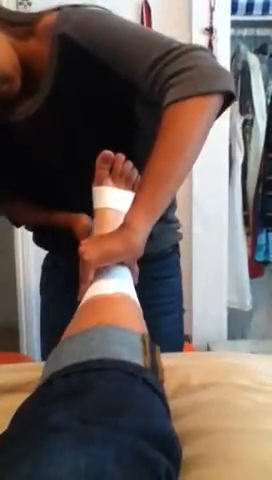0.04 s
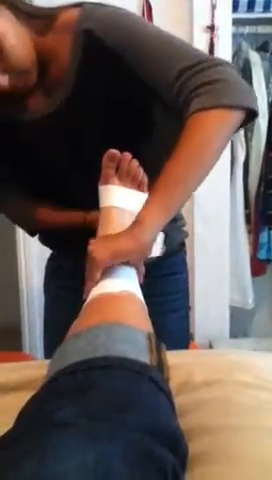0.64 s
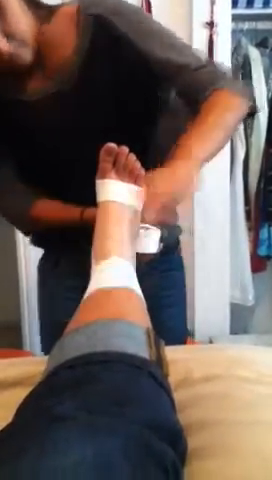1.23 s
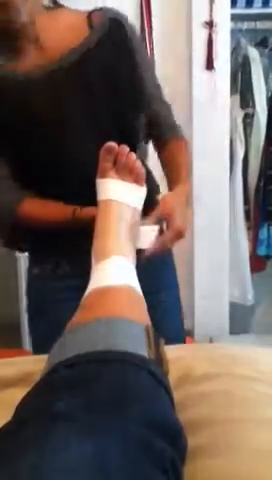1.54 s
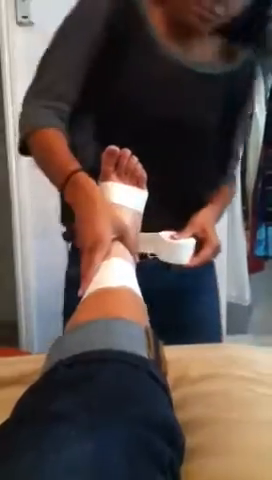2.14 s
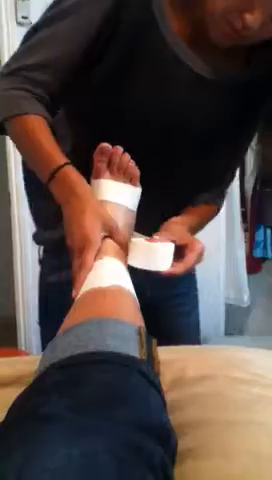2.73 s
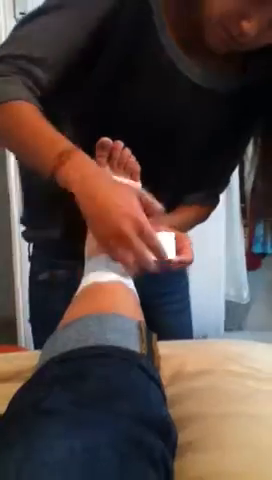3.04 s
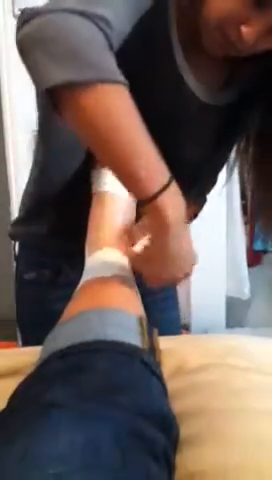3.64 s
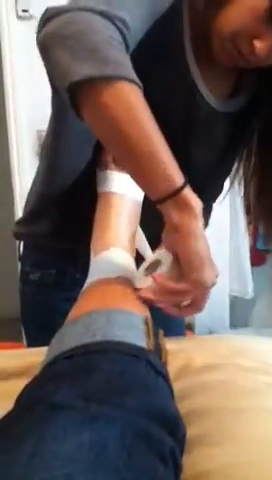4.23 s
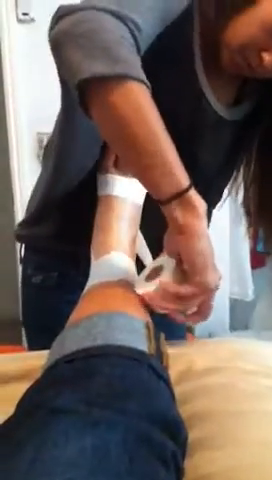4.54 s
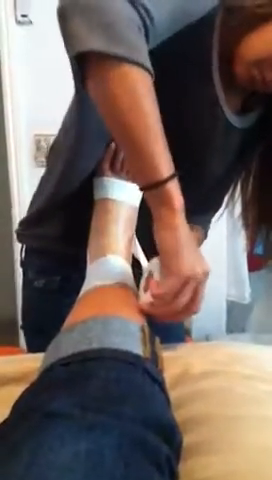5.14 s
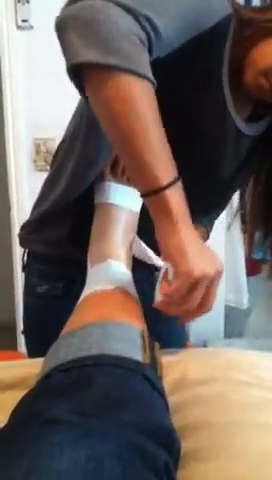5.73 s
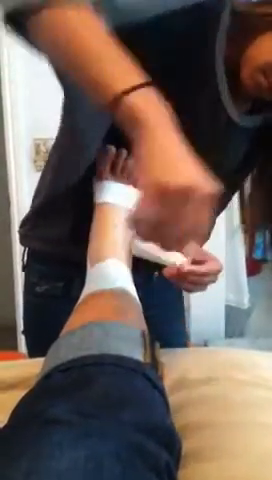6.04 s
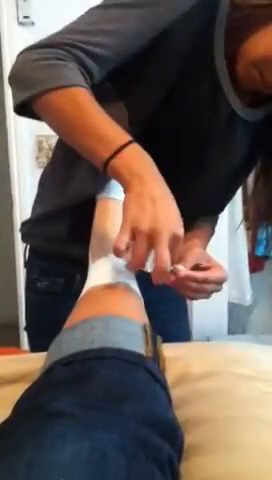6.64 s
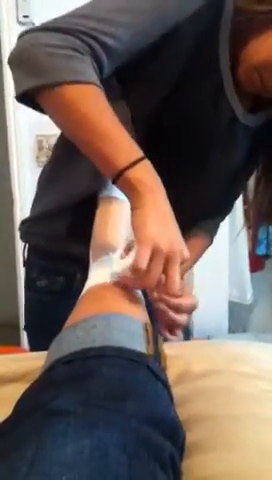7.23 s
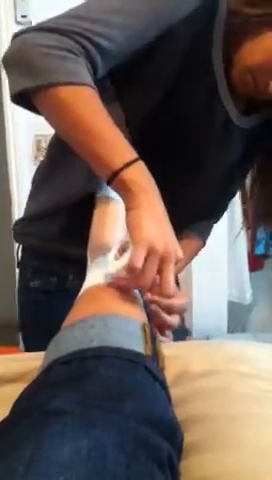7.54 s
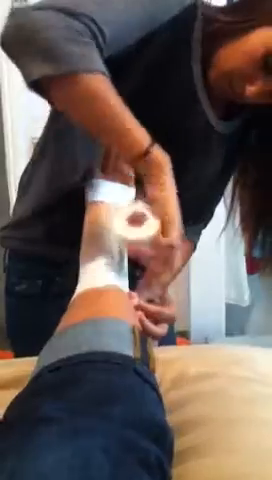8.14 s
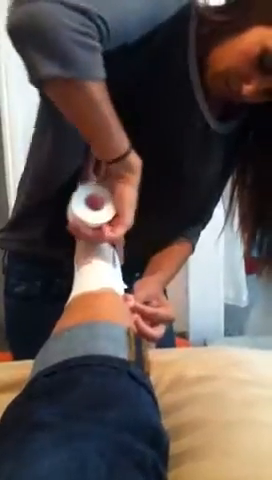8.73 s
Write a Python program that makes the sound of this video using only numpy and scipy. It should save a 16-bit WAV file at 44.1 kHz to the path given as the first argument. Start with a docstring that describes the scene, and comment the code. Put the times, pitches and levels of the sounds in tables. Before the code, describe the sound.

In a small quiet room with faint rumble and hiss, a hand brushes over taped skin near the microphone. Two lengths of sticky tape unwind with a fine crackle, the second trailing off into small clicks. One short, sharp rip, the loudest sound, tears the tape. After it come very faint high squeaks and soft rubbing as fingers stick the end down.

```python
"""Taping an ankle

In a small quiet room a palm smooths tape down, skin catching in countless small slips. Two lengths peel
off the roll with a fine crackle of snapping glue threads, and the strip tears across in one quick rip.
Fingers press the end on with small ticks and faint stick-slip squeaks, over low rumble and hiss."""
import sys
import numpy as np
from scipy import signal
from scipy.fft import rfft, irfft
from scipy.io import wavfile
from scipy.ndimage import uniform_filter1d

SR = 44100
rng = np.random.default_rng(int(sys.argv[2]) if len(sys.argv) > 2 else 0)


def store_pcm(level_fs):
    """Save levels as 16-bit WAV."""
    pcm = np.round(np.clip(level_fs, -1, 1) * 32767).astype(np.int16)
    wavfile.write(sys.argv[1], SR, np.atleast_2d(pcm).T)


N = 396900
TIME = np.arange(N) / SR

# top end of peel and tear: freq_hz, gain_db
FIZZ_SPECTRUM = [(4000, -27), (6500, -3.5), (8000, 0.5), (10000, -1.5), (12500, -7), (15500, -26.5)]


def from_db(db):
    """Decibels to gain."""
    return 10 ** (np.asarray(db) / 20)


def unit_rms(x):
    """Scale to unit power."""
    return x / np.sqrt(np.mean(x ** 2) + 1e-20)


def in_time(rows):
    """Columns after time_s, interpolated to every sample."""
    time_s, *columns = np.transpose(rows)
    return [np.interp(TIME, np.sort(time_s), column) for column in columns]


def during(rows):
    """Soft-edged gate from the first row's time to the last."""
    return uniform_filter1d(1. * ((TIME >= rows[0][0]) & (TIME <= rows[-1][0])), size=128)


def at_hz(points, hz):
    """Read a table on a log-frequency axis."""
    freq_hz, value = np.transpose(points)
    return np.interp(np.log(hz + 1e-3), np.log(freq_hz), value)


def coloured(x, spectrum):
    """Minimum-phase filter of unit power gain; rolls off below the first point."""
    size = 8192
    hz = np.arange(size // 2 + 1) * SR / size
    gain = from_db(at_hz(spectrum, hz)) * np.clip(hz / spectrum[0][0], 1e-2, 1) ** 2
    cepstrum = irfft(np.log(gain))[:size // 2]
    cepstrum[0] = 0
    response = irfft(np.exp(rfft(2 * cepstrum, size)))
    return signal.oaconvolve(x, response / np.linalg.norm(response))[:N]


def resonate(x, hz, width_hz):
    """Two-pole resonance, unit peak gain."""
    radius = np.exp(-np.pi * width_hz / SR)
    feedback = [1, -2 * radius * np.cos(2 * np.pi * hz / SR), radius ** 2]
    return signal.lfilter(np.array([1, 0, -1]) * (1 - radius ** 2) / 2, feedback, x + 1e-18)


def gliding_resonance(x, hz, width_hz):
    """Resonance following a pitch curve; unit power."""
    carrier = np.exp(2j * np.pi * np.cumsum(hz) / SR)
    baseband = signal.lfilter(*signal.butter(2, width_hz / 2, fs=SR), x / carrier + 1e-18)
    return unit_rms(np.real(baseband * carrier))


def wander(rate_hz):
    """Random motion, rate_hz new values a second; spread about 1."""
    return 1.2 * np.interp(TIME * rate_hz, np.arange(6000), rng.standard_normal(6000))


def grains(per_s, spread_db, clump_db, clump_hz=140):
    """Tiny clumped snaps of uneven size; even power over longer times."""
    chance, draw = rng.random((2, N))
    born = chance < per_s / SR
    signed = draw[born] - .5
    excess = np.minimum(-np.log(2 * np.abs(signed) + 1e-9), 4.5)
    snaps = np.zeros(N)
    snaps[born] = from_db(spread_db * excess + clump_db * wander(clump_hz)[born]) * np.sign(signed)
    return snaps / np.sqrt(np.abs(uniform_filter1d(snaps ** 2, size=2600)) + 1e-6)


def add(track, start_s, sound):
    """Mix a short sound in at start_s."""
    start = max(int(start_s * SR), 0)
    track[start:start + len(sound)] += sound[:N - start]


def background(rumble_db=-54, hiss_db=-60.5):
    """Steady room rumble and microphone hiss."""
    # noise spectra: freq_hz, gain_db
    rumble_spectrum = [(15, -53), (25, -19), (70, -6), (92, -9.5), (107, 1.5), (129, -1.5), (270, -3),
                       (362, -9.5), (408, -9.5), (444, -13.5), (510, -13), (595, -15.5), (882, -14),
                       (1100, -18.5), (1500, -23.5), (1950, -64), (3300, -120)]
    hiss_spectrum = [(1000, -18), (1500, 0.5), (2500, -0.5), (4000, -2.5), (7000, -3.5), (10000, -4),
                     (13000, -7.5), (16000, -11)]
    rumble = from_db(rumble_db) * coloured(rng.standard_normal(N), rumble_spectrum)
    return rumble + from_db(hiss_db) * coloured(rng.standard_normal(N), hiss_spectrum)


def room(x, first_echo_s=0.0047):
    """Dense reflections off near walls, dying by octave band; unit power gain."""
    # reverberation time: freq_hz, t60_s
    decay_times = [(200, 0.67), (1000, 0.11), (4000, 0.23), (8000, 0.18), (16000, 0.21)]
    t, tail = TIME[:SR // 2], 0
    edges_hz = np.geomspace(125, 16000, 8)
    for low, high in zip(edges_hz, edges_hz[1:]):
        octave = signal.butter(2, [low, high], "band", fs=SR, output="sos")
        band = signal.sosfilt(octave, rng.standard_normal(len(t)))
        t60_s = at_hz(decay_times, np.sqrt(low * high))
        tail = tail + band * np.exp(-np.log(1000) * t / t60_s)
    tail = tail * (t > first_echo_s)
    return signal.oaconvolve(x, tail / np.linalg.norm(tail))[:N]


def brushes(width_ratio=0.65):
    """Light touches of fingers and cloth swell and fade."""
    # touches: centre_s, half_length_s, level_db, centre_hz
    touches = [(.06, .06, -60.5, 4000), (0.237, .005, -50.5, 3600), (.345, 0.013, -56, 3300),
               (.41, 0.022, -55, 3800), (0.542, 0.17, -58.5, 2760), (1.37, .03, -63, 8000),
               (4.87, 0.034, -60, 6000), (5.14, 0.18, -60, 5500), (5.305, 0.043, -60.5, 8000),
               (5.967, 0.1, -63, 6000), (6.26, 0.042, -60, 5470), (6.375, .03, -61, 6000),
               (6.483, 0.041, -58, 5500), (8.4, 0.14, -58, 1080), (8.396, 0.13, -59.5, 3260),
               (8.577, 0.054, -56, 5000)]
    out = np.zeros(N)
    slips = grains(per_s=13000, spread_db=1.5, clump_db=3.0)
    for centre_s, half_s, level_db, hz in touches:
        touch = slips[int((centre_s - half_s) * SR):int((centre_s + half_s) * SR)]
        brush = unit_rms(resonate(touch, hz, width_ratio * hz))
        add(out, centre_s - half_s, from_db(level_db) * brush * np.hanning(len(touch)))
    return out


def squeaks(fade_s=0.013, glide_s=0.023, stutter_db=2.0):
    """Tape and skin stick and slip: tones bend up to a pitch and off it, hoarser and louder when flat."""
    # slides: start_s, end_s, held_hz, bend_ratio, level_db
    slides = [(4.058, 4.116, 2150, .25, -64.5), (4.12, 4.19, 2900, 0.17, -58.5),
              (4.85, 4.933, 2490, 0.03, -70), (5.383, 5.442, 2650, 0.049, -68),
              (6.144, 6.215, 2800, 0.16, -63.5), (6.387, 6.74, 3430, 0.33, -68.5),
              (6.85, 7.174, 3400, 0.4, -70.5), (7.275, 7.544, 3450, 0.32, -65.5),
              (7.6, 7.904, 3570, 0.54, -73), (8.0, 8.06, 3500, 0, -68), (8.108, 8.23, 5150, 0.076, -71),
              (8.464, 8.663, 5130, 0.047, -66), (8.626, 8.71, 5700, 0, -66),
              (8.62, 8.718, 2850, 0.021, -61), (8.72, 8.843, 2830, 0, -68.5)]
    out = np.zeros(N)
    slips = rng.standard_normal(N) * from_db(stutter_db * wander(60))
    for start_s, end_s, held_hz, bend, level_db in slides:
        span = slice(int(start_s * SR), int(end_s * SR))
        t = TIME[span] - TIME[span][0]
        left_s = t[::-1]
        flatness = abs(bend) * (np.exp(-t / glide_s) + np.exp(-left_s / glide_s))
        pitch_hz = held_hz * (1 - flatness)
        clear = gliding_resonance(slips[span], pitch_hz, width_hz=90 + 600 * abs(bend))
        hoarse = gliding_resonance(slips[span], pitch_hz, width_hz=700)
        tone = clear + 6.5 * flatness ** 0.81 * hoarse
        fade = np.minimum(np.minimum(t, left_s) / fade_s, 1)
        add(out, start_s, from_db(level_db) * tone * fade)
    return out


def ticks(decay_s=0.0019, width_ratio=0.61, gain_db=5.5):
    """Sticky spots let go, each a brief burst in a broad resonance."""
    # releases: start_s, level_db, centre_hz
    releases = [(2.4851, -34, 5170), (2.7154, -40, 5500), (3.352, -45, 7390), (4.362, -37, 7950),
                (4.4145, -43, 4410), (4.4573, -37, 7000), (4.493, -35, 8000), (4.8536, -48, 5490),
                (5.1169, -41, 4660), (6.2988, -41, 5100)]
    out, t = np.zeros(N), TIME[:1024]
    for start_s, level_db, hz in releases:
        burst = rng.standard_normal(len(t)) * np.exp(-t / decay_s)
        tick = resonate(burst, hz, width_ratio * hz)
        add(out, start_s, from_db(level_db + gain_db) * tick / np.abs(tick).max())
    return out


def rubbing(swell_db=23, sag_db_per_s=18, lift_db_per_s=312):
    """A palm catches on the weave in small slips; strokes swell, ease, and die as the hand lifts."""
    # palm strokes: start_s, full_pressure_s, lift_s, level_db
    strokes = [(0.0, 0.014, 0.084, -62), (0.168, 0.83, 1.023, -47.5), (2.732, 2.864, 2.897, -44),
               (3.008, 3.076, 3.12, -51.5), (7.73, 7.81, 7.9, -61.5), (8, 8.012, 8.026, -55.5),
               (8.458, 8.556, 8.5, -56), (8.64, 8.916, 9.0, -49.5)]
    # skin on cloth: freq_hz, gain_db
    rub_spectrum = [(500, -28), (1500, -10), (2600, -6.5), (4000, 0), (6000, 0), (9500, -1), (12500, -4),
                    (16000, -17)]
    envelope = 0
    for start_s, full_s, lift_s, level_db in strokes:
        onset_db = swell_db * np.maximum(full_s - TIME, 0) / max(full_s - start_s, 1e-3)
        sag_db = sag_db_per_s * np.maximum(TIME - full_s, 0)
        lift_db = lift_db_per_s * np.maximum(TIME - lift_s, 0)
        envelope = envelope + from_db(level_db - onset_db - sag_db - lift_db)
    return envelope * coloured(grains(per_s=14000, spread_db=1.5, clump_db=1.3), rub_spectrum)


def strip_echoes(snaps, pitch_hz, reflection=0.48):
    """Waves run along the strip and return inverted, favouring odd multiples of its pitch."""
    trip_samples = SR / (2 * pitch_hz)
    n = np.arange(N)
    return unit_rms(sum((-reflection) ** k * np.interp(n - k * trip_samples, n, snaps) for k in range(5)))


def strip_rasp(snaps, pitch_hz, stutter_db=1.5, width_ratio=0.29):
    """Glue gives unevenly, driving bands at 5, 7 and 9 times the strip's pitch."""
    wobble = 0.035 * (pitch_hz / 470) ** 2.7  # a short, high strip shakes more
    shaken_hz = pitch_hz * (1 + wobble * wander(149.7))
    jerks = snaps * from_db(stutter_db * wander(60.8))
    return [gliding_resonance(jerks, k * shaken_hz, width_ratio * k * pitch_hz.mean()) for k in (5, 7, 9)]


def peeling(easy_pull_db=-48, roll_hz=470, roll_width_hz=23, roll_boost_db=5):
    """Glue threads snap at the peel line; the harder the pull, the more strip and roll sound with them."""
    # surges off the roll, one list a pull: time_s, level_db
    pulls = [
        [(1.57, -62.5), (1.644, -46), (1.664, -54), (1.832, -45.5), (1.838, -50.5), (2.01, -41.5),
         (2.052, -45.5), (2.15, -40), (2.2, -44.5), (2.306, -40.5), (2.352, -49.5), (2.362, -42.5),
         (2.476, -42), (2.486, -37.5), (2.68, -53), (2.684, -53), (2.75, -65)],
        [(3.12, -58.5), (3.212, -59), (3.362, -52), (3.384, -65), (3.45, -50.5), (3.604, -42.5), (3.692, -45.5),
         (3.714, -39), (3.784, -49.5), (3.818, -41), (3.862, -48.5), (4.17, -49.5), (4.18, -53), (4.352, -54.5),
         (4.36, -52), (4.506, -50.5), (4.7, -62.5)],
    ]
    # free strip as length and tension change, one list a pull: time_s, pitch_hz, ring_rel_db, rasp_rel_db
    strips = [
        [(1.62, 370, -11, -19), (1.85, 400, -12.5, -18), (2.07, 438, -14, -17), (2.14, 470, -6.5, -5),
         (2.26, 480, -6.5, -5), (2.43, 424, -5, -9), (2.53, 380, -1.5, -17), (2.65, 328, -8, -16)],
        [(3.14, 490, -11, 8), (3.35, 463, -9, 7), (3.49, 483, -16, 7), (3.6, 574, -10, -3),
         (3.72, 713, -11.5, 0), (3.81, 600, -9.5, -20), (4.04, 515, -8.5, -26), (4.17, 580, -11, -8),
         (4.5, 590, -17, -15)],
    ]
    # spectra of glue, strip and roll: freq_hz, gain_db
    crackle_spectrum = [(1200, -9), (2400, 6), (3200, 10), (4000, 10.5), (5600, 8.5), (6600, 2.5),
                        (9000, -29)]
    strip_spectrum = [(500, -19.5), (850, -9.5), (1130, 1), (1520, 1.5), (1850, -3), (2300, 3), (2900, -4),
                      (4200, -17.5)]
    roll_spectrum = [(200, -28), (350, 1.5), (460, 5), (650, 2.5), (900, 6), (1500, -28.5)]
    snaps = grains(per_s=4500, spread_db=3.0, clump_db=1.5)
    level_db, = in_time(np.vstack(pulls))
    pitch_hz, ring_db, rasp_db = in_time(np.vstack(strips))
    effort_db = level_db - easy_pull_db

    fifth, seventh, ninth = strip_rasp(snaps, pitch_hz)
    rasp = from_db(rasp_db) * (fifth + from_db(-1.5) * seventh)
    crackle = from_db(-2) * coloured(snaps, crackle_spectrum) + from_db(-11) * ninth
    # the rasp takes its power from the crackle
    glue = from_db(level_db - 3) * (crackle + rasp) / np.hypot(1, from_db(rasp_db))
    fizz = from_db(-52.5 + 0.87 * effort_db) * coloured(snaps, FIZZ_SPECTRUM)

    waves = strip_echoes(snaps, pitch_hz)
    strip = from_db(level_db + ring_db - 1.1) * coloured(waves, strip_spectrum)
    in_tune = np.exp(-((pitch_hz - roll_hz) / roll_width_hz) ** 2)  # the roll groans at its own pitch
    roll = from_db(-68 + 1.64 * effort_db + roll_boost_db * in_tune) * coloured(waves, roll_spectrum)
    return sum(map(during, pulls)) * (glue + fizz + strip + roll)


def tearing(peak_threads_per_s=1080, jitter=0.1, fibre_s=0.00079, part_s=5.783, flap_s=0.0027):
    """Warp threads break in turn, each a burst of parting fibres; loose ends flutter, then flap."""
    # rip across the weave: time_s, level_db, fizz_rel_db
    rip = [(5.737, -39.5, -6), (5.749, -32, 5), (5.769, -20, -6), (5.785, -22, -3.5)]
    # narrow ringing tones that colour the rip: freq_hz, width_hz, gain_db
    tones = [(1970, 55, 6), (2980, 110, -15), (4103, 45, 3), (5290, 50, 3), (7200, 60, 9)]
    # spectra of cloth and loose ends: freq_hz, gain_db
    cloth_spectrum = [(120, -18), (400, -21), (800, -21), (1300, -4.5), (1900, -2), (3000, 0), (4200, -1),
                      (5600, -3), (7000, -8), (10000, -23)]
    flap_spectrum = [(150, -15), (450, -12), (740, -10.5), (960, -1.5), (1200, -2), (1700, -5),
                     (2600, -19.5)]
    level_db, fizz_db = in_time(rip)
    threads_per_s = peak_threads_per_s * from_db(0.16 * (level_db - level_db.max()))
    broken_count = np.floor(np.cumsum(threads_per_s * (1 + jitter * wander(600))) / SR)
    breaks = np.diff(broken_count, prepend=0)
    bursts = signal.lfilter([1], [1, -np.exp(-1 / (fibre_s * SR))], breaks)
    envelope = unit_rms(bursts / np.sqrt(threads_per_s)) * from_db(level_db) * during(rip)
    cloth_force, fizz_force, flap_force = envelope * rng.choice([-1, 1], (3, N))

    cloth = coloured(cloth_force, cloth_spectrum)
    ringing = sum(from_db(gain_db) * resonate(cloth, hz, width_hz) for hz, width_hz, gain_db in tones)
    fizz = coloured(fizz_force * from_db(fizz_db), FIZZ_SPECTRUM)
    looseness = from_db(-17.5) + from_db(-4.5) * np.exp(-np.abs(TIME - part_s) / flap_s)
    flap = coloured(flap_force * looseness, flap_spectrum)
    return from_db(-0.9) * (from_db(-0.2) * (cloth + ringing) + fizz + flap)


def scene(reverb_db=-9.5):
    """Hands and tape at arm's length, the same in both channels."""
    hands = rubbing() + peeling() + tearing() + ticks() + brushes() + squeaks()
    mono = hands + from_db(reverb_db) * room(hands) + background()
    return np.array([mono, mono])


def record(dry):
    """Steep low-pass."""
    cutoff_hz = 15800
    return signal.sosfilt(signal.ellip(12, .1, 80, cutoff_hz, fs=SR, output="sos"), dry)


dry = scene()
out = record(dry)
store_pcm(out)
```